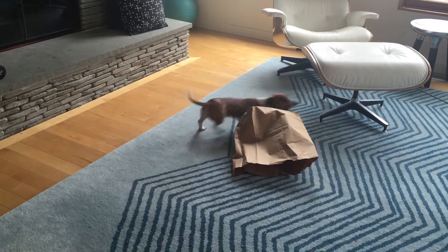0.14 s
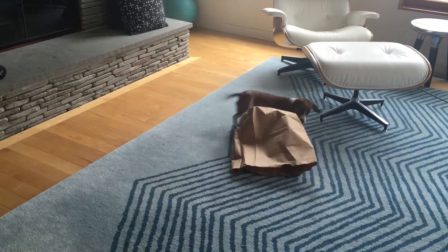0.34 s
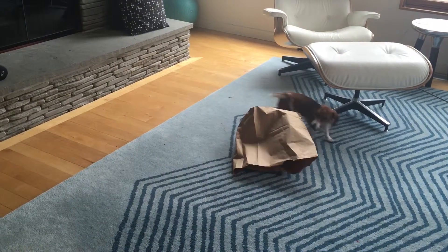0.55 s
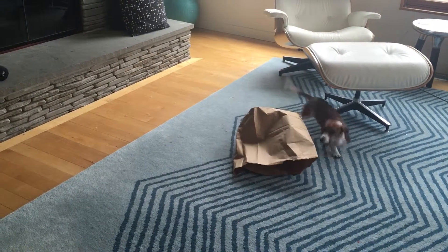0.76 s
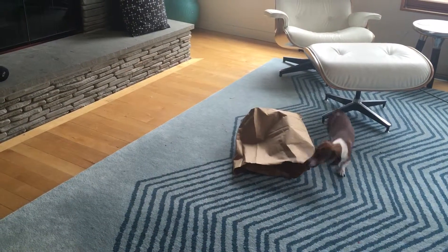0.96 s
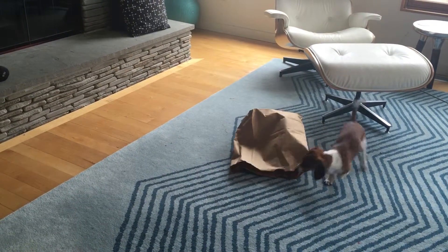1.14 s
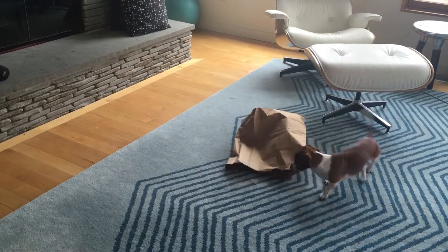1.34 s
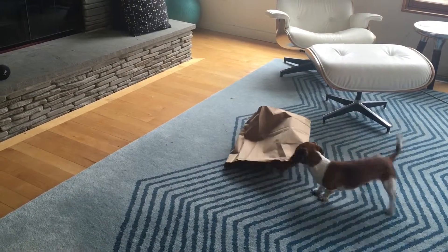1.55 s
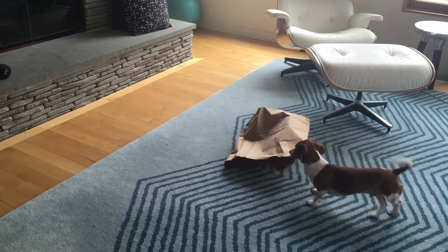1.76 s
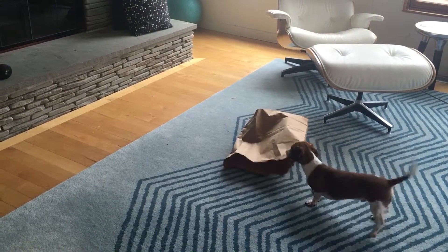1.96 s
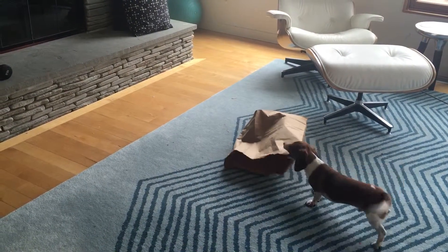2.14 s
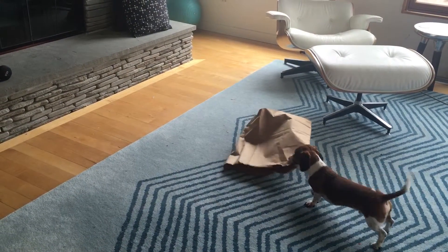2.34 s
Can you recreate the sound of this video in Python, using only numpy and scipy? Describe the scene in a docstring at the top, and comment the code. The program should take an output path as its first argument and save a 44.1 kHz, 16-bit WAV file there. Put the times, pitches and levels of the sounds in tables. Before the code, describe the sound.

One loud, high puppy yelp near the start echoes in a bare-sounding room, heard by a single microphone at some distance; then light scuffs, a tiny nasal squeak, and bursts of paper crackle with hollow bag knocks.

```python
"""Puppy and paper bag

A puppy trots round a paper bag on a rug in a large, hard living room.
One shrill yelp, a stack of pure tones with some breath, rings on in the room. Thin nose whistles,
tones on hissing air, come before and after it. Paws scuff the rug in showers of tiny clicks, and
the bag snaps, rustles and thuds in noise bursts and short rings as the puppy noses into it."""
import sys
import numpy as np
from scipy import signal
from scipy.io import wavfile
from scipy.ndimage import uniform_filter1d, minimum_filter1d

SR = 44100
rng = np.random.default_rng(int(sys.argv[2]) if len(sys.argv) > 2 else 0)


def master(y):
    """Save y as 16-bit WAV."""
    cut = np.clip(np.atleast_2d(y).T, -1, 1)
    pcm = np.round(cut * 32767)  # scale
    wavfile.write(sys.argv[1], SR, pcm.astype(np.int16))


def undo_db(level):
    """Turn decibels back into plain size, where 20 dB means ten times bigger."""
    steps = np.asarray(level, float) / 20
    return 10 ** steps


N = 105840  # samples, 2.4 s

# In the spectrum tables only the shape counts: the filter evens out the overall level.

# Quiet air of the room, spectrum: f/Hz, level per Hz/dB
AIR_SPECTRUM = [(20, -22.5), (60, -4), (300, 0.5), (700, -23.5), (1500, -5), (3000, -26), (5500, -20),
                (15500, -31)]
AIR_DB = -61

# How long each band of the room takes to fall by 60 dB: f/Hz, time/s
ROOM_T60 = [(100, .9), (1000, 1.7), (1900, 1.48), (3800, 1.15), (5700, .75), (8000, .55), (11000, .38),
            (15000, .3)]
# How strongly the room answers in each band: f/Hz, level/dB
ROOM_COLOUR = [(900, -2), (1900, 1), (3800, -11.5), (5700, -10), (8000, -10), (15000, -20.5)]
ROOM_GAP_S, ROOM_BUILD_S = .008, .035  # silence first, then a rise to full density of sound
VOICE_WET_DB, NOSE_WET_DB, BAG_WET_DB = 1.5, 3.5, -3.5  # how much of each goes into the room
# First reflections off floor and nearby furniture: delay/s, level/dB
ECHOES = [(.0031, -7), (.0074, -11), (.0133, -12)]

# Paws and paper, levels over time: t/s, low rumble/dB, scuff/dB, crackle/dB, hiss/dB
RUSTLE_LEVELS = [(0, -49.5, -58.5, -59.5, -63), (0.029, -53, -62.5, -50.5, -68.5),
                 (0.121, -51.5, -65.5, -78.5, -88), (0.171, -61.5, -78, -57.5, -88),
                 (.29, -65.5, -57, -49.5, -74.5), (.35, -60, -48.5, -71.5, -74),
                 (0.551, -50.5, -57, -72.5, -69), (0.658, -66, -57.5, -69, -73.5),
                 (.85, -72.5, -79, -79, -89), (1.02, -60.5, -61, -50, -69),
                 (1.09, -57, -49.5, -52.5, -61.5), (1.25, -63, -53.5, -58, -60.5),
                 (1.451, -58, -55, -56.5, -57.5), (1.584, -69.5, -57, -57.5, -63),
                 (1.62, -56, -43, -50.5, -64.5), (1.718, -61.5, -50.5, -52, -61),
                 (1.82, -65, -58, -63, -90), (1.939, -61.5, -51.5, -56, -69.5),
                 (2.017, -58.5, -47.5, -48.5, -62), (2.14, -65.5, -57.5, -61, -79),
                 (2.25, -65.5, -53, -57, -69.5), (2.329, -59, -50, -44.5, -65),
                 (2.4, -70.5, -50, -52.5, -62.5)]
# Low rumble, spectrum: f/Hz, level per Hz/dB
RUMBLE_SPECTRUM = [(15, -28), (30, -18), (50, -1), (80, -1), (130, -7), (200, -12), (400, -46.5)]
# Dull scuffing, spectrum: f/Hz, level per Hz/dB
SCUFF_SPECTRUM = [(60, -26), (150, 5), (300, 2.5), (700, 2.5), (1600, -6), (2500, -15), (5000, -26.5),
                  (15500, -47)]
# Paper crackle, spectrum: f/Hz, level per Hz/dB
CRACKLE_SPECTRUM = [(400, -44), (1000, 4.5), (2000, 1), (3500, -1), (5500, -10), (8000, -23),
                    (15500, -39.5)]
# Hiss of paws on the rug, spectrum: f/Hz, level per Hz/dB
HISS_SPECTRUM = [(1500, -36), (4000, 0.5), (6500, 4), (9000, 1.5), (12000, -0.5), (15500, 0)]
# Average clicks per second, and how unevenly loud they are in dB
SCUFF_PER_S, SCUFF_SPREAD_DB = 1500, 2.6
CRACKLE_PER_S, CRACKLE_SPREAD_DB = 3000, 2
HISS_PER_S, HISS_SPREAD_DB = 13000, 3

# Knocks on the bag: t/s, level/dB
THUDS = [(1.098, -60.5), (1.61, -34), (1.64, -43.5), (1.998, -47.5), (2.188, -50.5), (2.292, -46)]
# Ringing tones of the hollow bag: f/Hz, level/dB, time to fall by 60 dB/s
BAG_TONES = [(123, -10, 0.15), (237, -6, 0.081), (282.5, -2, 0.33), (322.6, -3.5, 0.17), (441, 0.5, 0.06),
             (534, 5.5, 0.037), (803, -16, 0.076), (1111, 1, 0.042)]
THUD_RISE_S = .003

# Paper snaps: t/s, level/dB, ring f/Hz, tilt of the burst/dB per octave
SNAPS = [(0.4041, -48.5, 3800, 9), (1.053, -45, 2510, 4), (1.0609, -33.5, 3660, 3),
         (1.2327, -38.5, 3240, 0.5), (1.428, -49.5, 6040, 10.5), (1.5625, -39.5, 1330, -4),
         (1.593, -63, 9060, 13), (1.604, -35.5, 3400, -7.5), (1.6061, -31.5, 2190, 0.5),
         (1.6375, -33, 1524, -1), (1.651, -38.5, 4460, -4), (1.659, -52, 3300, -0.5),
         (1.6632, -48.5, 2830, 5.5), (1.8834, -41.5, 3450, 0), (1.961, -38, 1510, 3), (2, -39, 5600, 2.5),
         (2.006, -38, 3400, 4), (2.1817, -39.5, 1100, -0.5), (2.2465, -38.5, 2040, -4.5),
         (2.271, -38, 3350, 3.5), (2.3, -43, 2390, -0.5), (2.3145, -28, 1220, -0.5), (2.3225, -41, 6000, 1),
         (2.326, -39.5, 2150, 2), (2.341, -37, 1650, -7.5), (2.352, -41, 2340, 1.5)]
# Snapping paper before the tilt, spectrum: f/Hz, level per Hz/dB
PAPER_SPECTRUM = [(300, -36), (700, 9.5), (1200, 7), (2200, 3), (3600, -1.5), (6000, -7.5), (10000, -22.5),
                  (15500, -34.5)]
SNAP_RISE_S, SNAP_T60 = .0004, .018  # the burst rises, then falls by 60 dB, in seconds
RING_DB, RING_WIDTH_HZ = -1, 400  # a wider ring dies faster
TILT_HZ = 3000  # the tilt leaves this frequency alone

# Nose whistles, one list each: t/s, pitch f/Hz, first/dB, second/dB, third partial/dB, breath/dB
WHISTLES = [
    [(.011, 5820, -67, -83.5, -95, -66.5), (.016, 5540, -55.5, -59, -109, -55),
     (.028, 5230, -53, -72.5, -96.5, -66), (.045, 5180, -71, -84.5, -92, -68.5)],
    [(.017, 5090, -87, -70.5, -85, -79.5), (.022, 4850, -74, -51, -80, -83),
     (.034, 4730, -63, -58.5, -96, -77.5), (.045, 4870, -77, -72, -82, -83.5)],
    [(.9, 4793, -88, -84, -76, -73.5), (.908, 4920, -59, -81, -84, -67.5),
     (.918, 5200, -46.5, -69.5, -64, -56), (.93, 5270, -47, -64.5, -70, -58),
     (.95, 5480, -75, -78, -74, -59), (.96, 5575, -60, -39.5, -83, -52), (.967, 5530, -48, -35, -80, -50.5),
     (.978, 5600, -63, -42, -70, -51), (.988, 5190, -46, -52, -59, -55.5), (.996, 4940, -66, -46, -52, -47),
     (1.006, 4700, -52, -49, -72, -56.5), (1.014, 4674, -74, -75, -90, -53)],
]
# Air hissing through the nose, spectrum: f/Hz, level per Hz/dB
NOSE_SPECTRUM = [(800, -19), (2000, -18), (3400, 12.5), (4300, -11), (5500, 1.5), (8000, -12.5),
                 (12000, -0.5), (15500, -18.5)]
NOSE_JITTER = .005  # typical pitch wobble, as a share of the pitch

# The yelp over time: t/s, pitch f/Hz, level/dB, overtones against it/dB, half pitch/dB, breath/dB
YELP = [(.199, 1865, -68.5, -2, -49, -69), (.2065, 1816, -18, -7, -48.5, -54),
        (.213, 1899, -12, -5.5, -43.5, -47.5), (.231, 1897, -11.5, 4, -30.5, -45.5),
        (.247, 1916, -9, -1, -23, -44), (.257, 1956, -13.5, 3, -16.5, -35.5),
        (.272, 1998, -15.5, -1, -38.5, -34.5), (.283, 1885, -15.5, -15, -32.5, -38),
        (.294, 1765, -22.5, -20.5, -26.5, -36.5), (.32, 1700, -47, -34, -29, -57)]
# Tones of the voice: multiple of the pitch, level/dB
OVERTONES = [(1, 1), (2, -10), (3, -27), (4, -41.5), (5, -25), (6, -35), (7, -26)]
# Tones between them, from the half pitch: multiple of the pitch, level/dB
HALF_TONES = [(.5, -2), (1.5, -9.5)]
# Breath in the yelp, spectrum: f/Hz, level per Hz/dB
BREATH_SPECTRUM = [(700, -29.5), (1500, -18), (2400, -33.5), (2950, -1.5), (3500, -5.5), (5300, -14),
                   (6200, 1), (7200, -11.5), (11000, -9), (15500, -21)]
YELP_JITTER = .0032  # typical pitch wobble, as a share of the pitch
TOP_FADE_DB_PER_S = 394.5  # partials above the fourth die out as the call goes on

CEILING, LIMIT_SAMPLES = .8, 441  # loudest peak allowed, and the smoothing time (10 ms)
EDGE_HZ = 15750  # the treble ends here


def evened(x):
    """Scales a sound to an average (rms) level of 1."""
    return x / np.sqrt(np.mean(x ** 2) + 1e-20)


def read(points, hz):
    """Reads a table between its points on a log-frequency axis."""
    f, value = np.transpose(points)
    return np.interp(np.log(hz + 1), np.log(f + 1), value)


def add(mix, s, sound):
    """Mixes a sound in, starting s seconds from the beginning."""
    part = mix[max(round(s * SR), 0):][:len(sound)]
    part += sound[:len(part)]


def colour(x, points):
    """Filters a sound to the shape of a spectrum table, with nothing heard ahead of its cause."""
    half = np.log(undo_db(read(points, np.fft.rfftfreq(4096, 1 / SR))))
    full = np.r_[half, half[-2:0:-1]]
    # The matching (minimum) phase packs the response close to its start
    taps = np.fft.ifft(np.exp(full - 1j * signal.hilbert(full).imag)).real[:2048]
    return signal.oaconvolve(x, taps / np.linalg.norm(taps))[:len(x)]


def noise(points):
    """Steady noise with the shape of a spectrum table."""
    return colour(rng.standard_normal(N), points)


def columns(table):
    """Draws each column of a timed table as a curve, from its first to its last time."""
    s, *cols = np.transpose(table)
    t = np.arange(s[0], s[-1], 1 / SR)
    return [np.interp(t, s, c) for c in cols]


def unsteady_phase(hz, jitter):
    """Adds up a slightly wobbling pitch into the phase of a tone."""
    wobble = evened(uniform_filter1d(rng.standard_normal(N), size=80))[:len(hz)]
    return 2 * np.pi * np.cumsum(hz * (1 + jitter * wobble)) / SR


def room_air():
    """The quiet, steady noise of air in the room."""
    return undo_db(AIR_DB) * noise(AIR_SPECTRUM)


def earlier_yelp():
    """An earlier yelp dying in the room: a narrow, fuzzy band that fades by 60 dB in 1.3 s."""
    band = noise([(1500, -40), (1660, 0), (1820, -40)])
    return undo_db(-55 - 60 * np.arange(N) / SR / 1.3) * band


def room():
    """Sparse taps of random sign that build up, each band dying at its own speed."""
    taps = np.zeros(2 * SR)
    at = np.arange(0, 2 * SR - 20, 20)
    taps[at + rng.integers(0, 20, len(at))] = rng.choice([-1., 1.], len(at))
    taps *= np.clip((np.arange(2 * SR) / SR - ROOM_GAP_S) / ROOM_BUILD_S, 0, 1)
    hz, t, bands = signal.stft(taps, SR, nperseg=256)
    bands = bands * undo_db(-60 * t / read(ROOM_T60, hz)[:, None])
    # Even out the bands, so that only the colour table sets their balance
    smooth = uniform_filter1d(abs(bands), size=5, axis=0)
    bands = bands / np.linalg.norm(smooth, axis=1)[:, None]
    plain = signal.istft(bands, SR, nperseg=256)[1]
    coloured = signal.istft(bands * undo_db(read(ROOM_COLOUR, hz))[:, None], SR, nperseg=256)[1]
    return coloured / np.linalg.norm(plain)


def echoed(x):
    """Adds the first reflections off floor and furniture."""
    out = x.copy()
    for delay, db in ECHOES:
        add(out, delay, undo_db(db) * x)
    return out


def grains(per_s, spread_db, points, level_db):
    """Random clicks of uneven size through one colour."""
    size = undo_db(spread_db * np.minimum(rng.exponential(1, N), 5)) * rng.choice([-1., 1.], N)
    clicks = size * (rng.random(N) < per_s / SR)
    return undo_db(level_db) * evened(colour(clicks, points))


def rustle():
    """Low rumble, dull scuffing, paper crackle and the hiss of paws on the rug."""
    s, *levels = np.transpose(RUSTLE_LEVELS)
    t = np.arange(N) / SR
    rumble_db, scuff_db, crackle_db, hiss_db = [np.interp(t, s, c) for c in levels]
    rumble = undo_db(rumble_db) * noise(RUMBLE_SPECTRUM)
    scuff = grains(SCUFF_PER_S, SCUFF_SPREAD_DB, SCUFF_SPECTRUM, scuff_db)
    crackle = grains(CRACKLE_PER_S, CRACKLE_SPREAD_DB, CRACKLE_SPECTRUM, crackle_db)
    hiss = grains(HISS_PER_S, HISS_SPREAD_DB, HISS_SPECTRUM, hiss_db)
    return rumble + scuff + crackle + hiss


def thuds():
    """The hollow bag rings low when knocked, each time with a slightly different mix of tones."""
    out, t = np.zeros(N), np.arange(12000) / SR
    for s, db in THUDS:
        ring = np.zeros(len(t))
        for hz, tone_db, t60 in BAG_TONES:
            start_db = db + tone_db + rng.normal(0, 2)
            ring += undo_db(start_db - 60 * t / t60) * np.sin(2 * np.pi * hz * t)
        add(out, s, np.minimum(t / THUD_RISE_S, 1) * ring)
    return out


def snaps():
    """A crease pops: a dying burst of noise and a short ring."""
    out, t = np.zeros(N), np.arange(3000) / SR
    shape = np.minimum(t / SNAP_RISE_S, 1) * undo_db(-60 * t / SNAP_T60)
    for s, db, hz, tilt_db in SNAPS:
        tilted = [(f, g + tilt_db * np.log2(f / TILT_HZ)) for f, g in PAPER_SPECTRUM]
        burst = shape * colour(rng.standard_normal(len(t)), tilted)
        ring = np.sqrt(2) * np.sin(2 * np.pi * hz * t) * np.exp(-np.pi * RING_WIDTH_HZ * t)
        add(out, s, undo_db(db) * (burst + undo_db(RING_DB) * ring))
    return out


def nose_whistles():
    """Thin, unsteady whistles of three partials riding on hissing air."""
    out, hiss = np.zeros(N), noise(NOSE_SPECTRUM)
    for table in WHISTLES:
        hz, *levels, air_db = columns(table)
        phase = unsteady_phase(hz, NOSE_JITTER)
        tone = sum(undo_db(db) * np.sin(k * phase) for k, db in enumerate(levels, 1))
        add(out, table[0][0], np.sqrt(2) * tone + undo_db(air_db) * hiss[:len(hz)])
    return out


def yelp():
    """Nearly pure vibration of the voice folds; a half pitch creeps in and breath takes over."""
    hz, db, over_db, half_db, breath_db = columns(YELP)
    top_db = TOP_FADE_DB_PER_S * np.arange(len(hz)) / SR
    phase = unsteady_phase(hz, YELP_JITTER)
    tone = np.zeros(len(hz))
    for k, g in OVERTONES:
        tone += undo_db(g + over_db * (k > 1) - top_db * (k > 4)) * np.cos(k * phase)
    for k, g in HALF_TONES:
        tone += undo_db(half_db + g) * np.cos(k * phase)
    breath = noise(BREATH_SPECTRUM)[:len(hz)]
    out = np.zeros(N)
    add(out, YELP[0][0], np.sqrt(2) * undo_db(db) * tone + undo_db(breath_db) * breath)
    return out


def scene():
    """Puppy and bag ring in one room, over its air and the tail of an earlier yelp."""
    background = room_air() + earlier_yelp()
    bag = rustle() + thuds() + echoed(snaps())
    whistle = nose_whistles()
    voice = yelp()
    send = undo_db(VOICE_WET_DB) * voice + undo_db(NOSE_WET_DB) * whistle + undo_db(BAG_WET_DB) * bag
    ringing = signal.fftconvolve(send, room())[:N]
    return (background + bag + whistle + voice + ringing)[None]


def band_limit(x):
    """A steep low-pass at the top of the band."""
    return signal.sosfilt(signal.butter(12, 15740, fs=SR, output="sos"), x)


def record(dry):
    """A limiter holds down peaks above the ceiling; then a filter cuts off the highest treble."""
    gain = minimum_filter1d(CEILING / np.maximum(abs(dry), CEILING), 2 * LIMIT_SAMPLES)
    held = dry * uniform_filter1d(gain, LIMIT_SAMPLES)
    edge = signal.firwin(511, EDGE_HZ, window=("kaiser", 9), fs=SR)
    finished = signal.oaconvolve(held, edge[None], "same")
    return band_limit(finished)


dry = scene()
out = record(dry)
master(out)
```